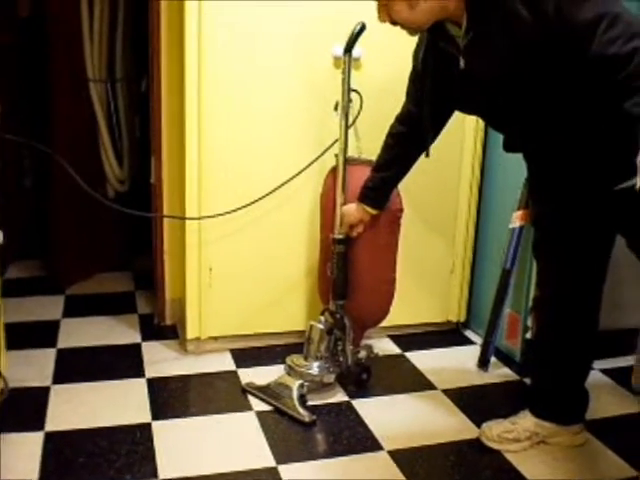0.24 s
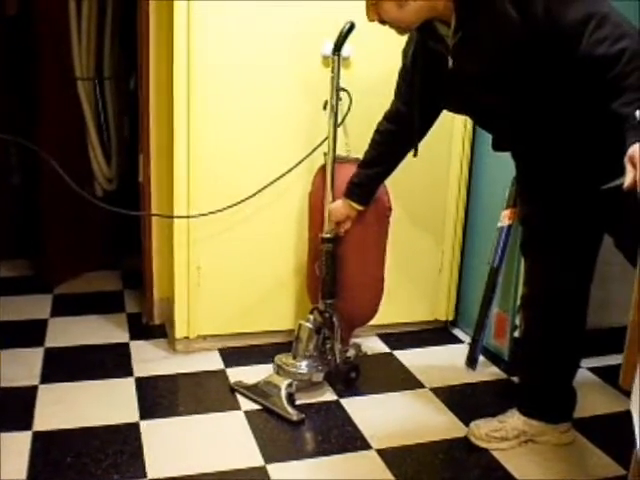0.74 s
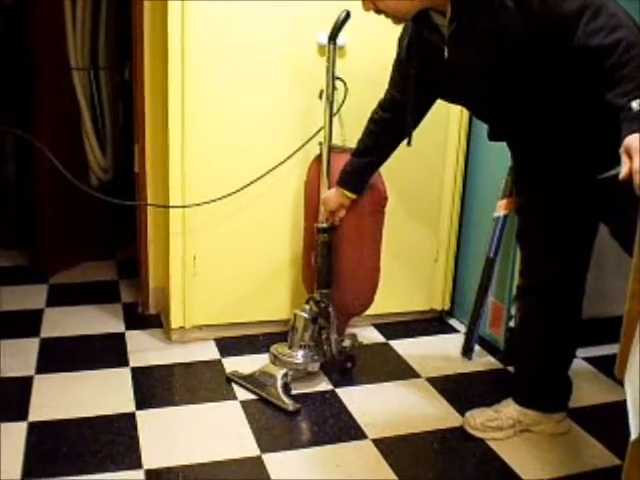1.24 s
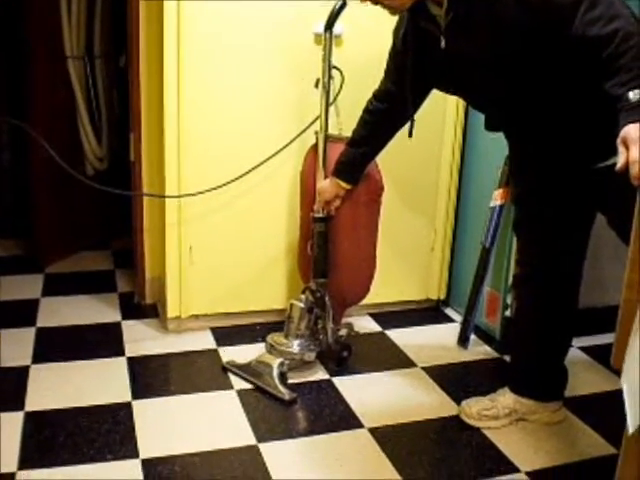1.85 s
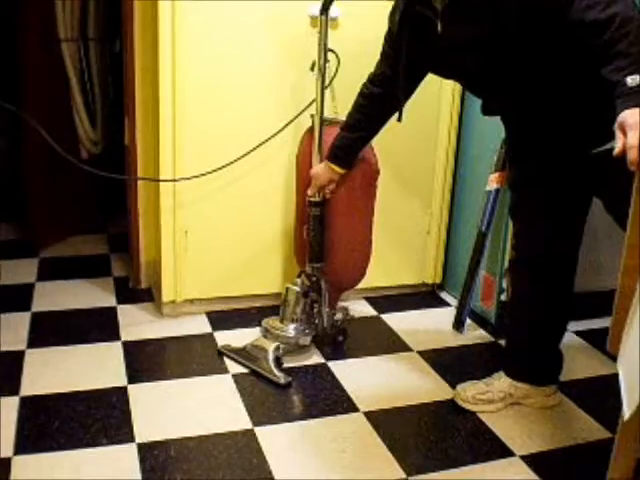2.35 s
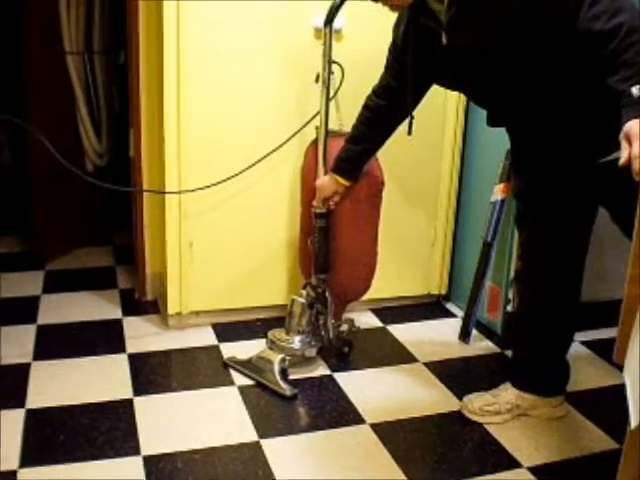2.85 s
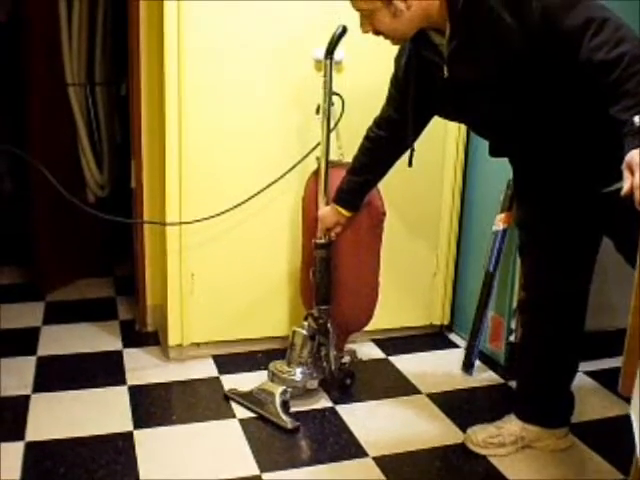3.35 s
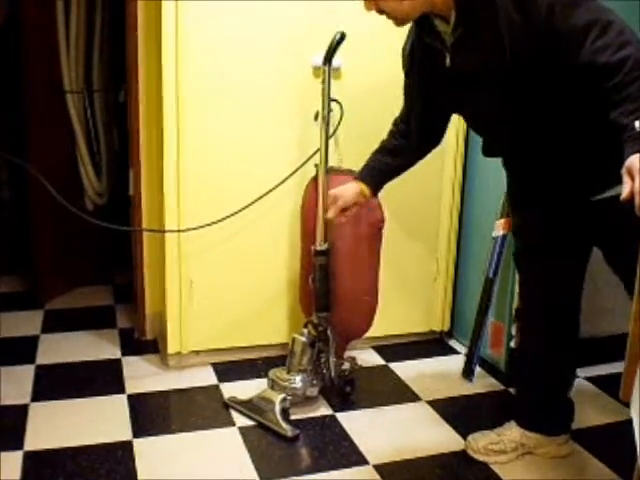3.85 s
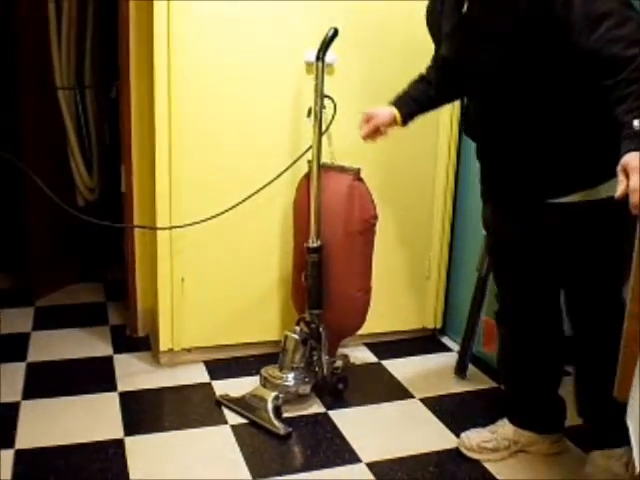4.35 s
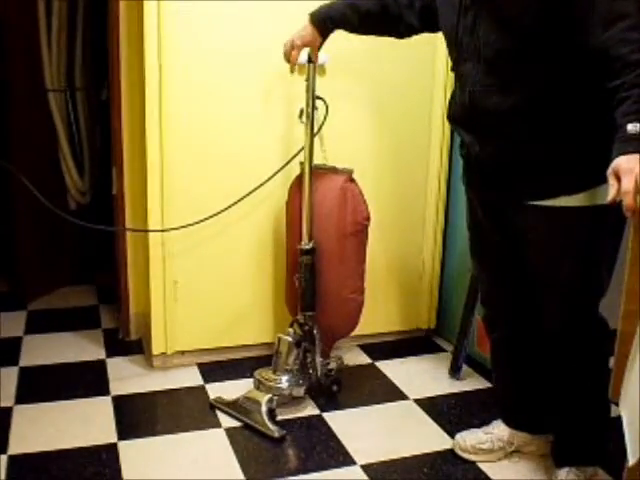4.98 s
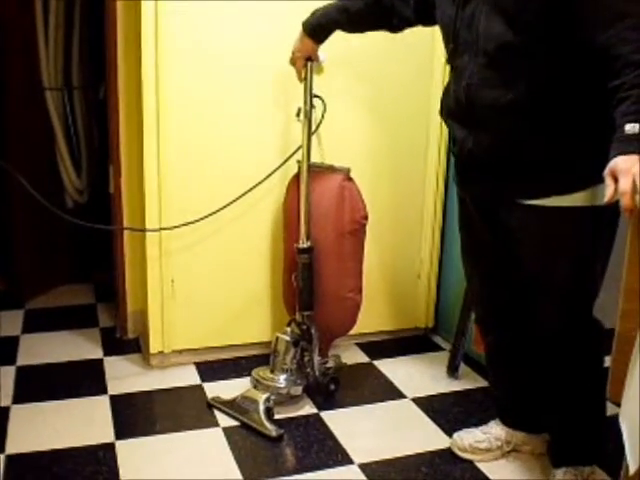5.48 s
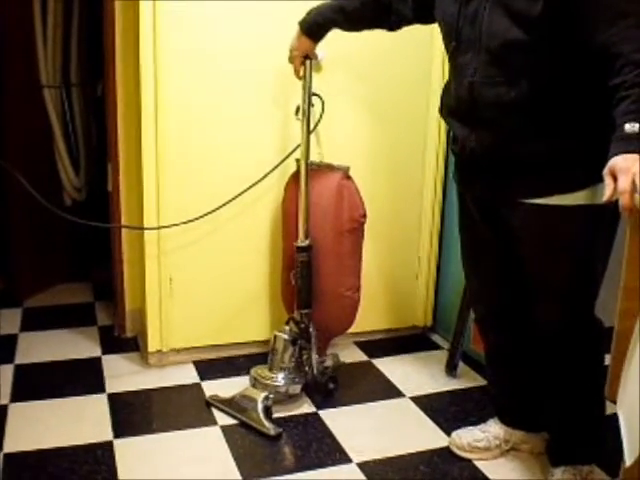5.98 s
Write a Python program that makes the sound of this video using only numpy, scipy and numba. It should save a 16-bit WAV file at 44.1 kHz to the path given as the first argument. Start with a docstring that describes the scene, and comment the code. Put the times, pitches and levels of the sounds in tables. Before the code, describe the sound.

An antique upright vacuum cleaner is already running in a small hard-floored room. Rushing air and a strong, wavering fan whistle start loud and high, slide down quickly, then level off. After about three seconds the pitch drops again and the sound thins, still running at the end. A small camera microphone gives a narrow, dull-topped sound that rasps when the whistle swells.

```python
"""An antique upright vacuum cleaner runs in a tiled room, its motor slowing from about 174 to 136 turns a second.
Shaped noise makes the rushing air; a seven-blade fan whistles at seven times the shaft speed.
Armature slots whine at eleven times the shaft speed, and the mains hum at 120 and 240 Hz in the housing.
A small camera with a narrow band picks it up; its fast limiter overloads when the whistle swells."""
import sys
import numpy as np
from scipy.fft import rfft, irfft, next_fast_len
from scipy.io import wavfile
from scipy.ndimage import map_coordinates
from numba import njit

SR = 44100
rng = np.random.default_rng(int(sys.argv[2]) if len(sys.argv) > 2 else 0)


def generate_wav(sig):
    """Save sig (samples, or channels by samples) to the path in sys.argv[1] as 16-bit PCM at SR."""
    pcm = np.round(np.clip(np.atleast_2d(sig).T, -1, 1) * 32767).astype(np.int16)
    wavfile.write(sys.argv[1], SR, pcm)


N = 274302

BLADES, SLOTS = 7, 11
CRUISE_HZ = 154  # shaft speed at which the air and whistle base levels apply
MAGNET_HZ = 120  # two field pulses per mains cycle


def amp(db):
    """Decibels to gain."""
    return 10 ** (np.asarray(db) / 20)


def unit(x):
    """Scale to rms 1."""
    return x / np.sqrt(np.mean(x ** 2) + 1e-20)


def along(points, hz):
    """Read (f/Hz, value) points on a log frequency axis."""
    f, value = np.transpose(points)
    return np.interp(np.log(hz + 1), np.log(f + 1), value)


def lift_db(resonances, hz):
    """Sum of the resonance lifts, in dB, at a frequency."""
    return sum(db / (1 + (2 * (hz - centre) / width) ** 2) for centre, width, db in resonances)


def wobble(rate_hz):
    """Smooth random curve with rate_hz knots a second."""
    knots = rng.standard_normal(int(N * rate_hz / SR) + 4)
    return map_coordinates(knots, [np.arange(N) * rate_hz / SR])


def filtered(x, response):
    """Multiply the spectrum of x by a response of frequency."""
    size = next_fast_len(N + SR // 2)
    spectrum = rfft(x, size) * response(np.fft.rfftfreq(size, 1 / SR))
    return irfft(spectrum, size)[:N]


def tone(cycles, rough, rate_hz):
    """Sine of rms 1 whose size and phase flutter randomly."""
    flutter = 1 + rough * (wobble(rate_hz) + 1j * wobble(rate_hz))
    return unit(np.real(flutter * np.exp(2j * np.pi * cycles)))


# motor shaft speed: t/s, f/Hz
SHAFT_SPEED = [(0.0, 174.5), (0.28, 174.25), (0.57, 167.55), (0.9, 162.68), (1.2, 159.88), (1.45, 158.07),
               (1.76, 156.32), (2.1, 155.32), (2.75, 154.11), (3.2, 153.78), (3.45, 149.89), (3.7, 146.85),
               (3.96, 144.78), (4.26, 142.38), (4.62, 140.21), (5.0, 138.73), (5.35, 137.74), (6.22, 136.2)]


def shaft_speed():
    """Shaft speed in Hz at each sample, as the motor slows."""
    t, hz = np.transpose(SHAFT_SPEED)
    return np.interp(np.arange(N) / SR, t, hz)


# spectral density of the rushing air: f/Hz, level/dB per Hz (relative)
AIR_SPECTRUM = [(25, -46.5), (70, -43.5), (120, -37.5), (200, -24), (340, -27.5), (450, -22), (650, -29.5),
                (800, -4), (1150, -20), (1400, -13.5), (1900, -12), (2200, -16.5), (3200, -14.5),
                (3750, -22)]
# resonances of fan case, nozzle and room: f/Hz, width/Hz, lift/dB
CAVITY_RESONANCES = [(247.4, 38, 9.5), (297, 24, 5.5), (404, 43, 5), (490, 22, 4.5), (550, 88, 9),
                     (619, 78, 12.5), (706.7, 54, 11), (880, 16, 0), (980, 26, 3), (1006, 29, 5),
                     (1072, 38, 15.5), (1181, 109, 15), (1294, 23, 7.5), (1342, 38, 6), (1499, 65, 6.5),
                     (1661, 110, 5.5), (1830, 80, 4.5), (2042, 72, 4), (2390, 27, 4), (2503, 24, 9),
                     (2774, 110, 6), (3150, 81, 5.5), (3460, 160, 5.5), (3626, 41, 9.5)]


def air_colour(hz):
    """Gain of turbulence heard through the machine's resonances."""
    return amp(along(AIR_SPECTRUM, hz) + lift_db(CAVITY_RESONANCES, hz))


def air(speed, split_hz=1250, roar_db=-26.5, hiss_db=-27.0, roar_db_per_octave=21, hiss_db_per_octave=18.5):
    """Turbulence: a roar in the fan case and a hiss at the nozzle, both easing as the motor slows."""
    def low_share(hz):
        return 1 / (1 + (hz / split_hz) ** 6)

    def roar_response(hz):
        return air_colour(hz) * np.sqrt(low_share(hz))

    def hiss_response(hz):
        return air_colour(hz) * np.sqrt(1 - low_share(hz))

    octaves = np.log2(speed / CRUISE_HZ)
    roar = unit(filtered(rng.standard_normal(N), roar_response))
    hiss = unit(filtered(rng.standard_normal(N), hiss_response))
    roar_level_db = roar_db + roar_db_per_octave * octaves + 0.28 * wobble(9.8)
    hiss_level_db = hiss_db + hiss_db_per_octave * octaves + 0.41 * wobble(14)
    return roar * amp(roar_level_db) + hiss * amp(hiss_level_db)


# peaks and notches of fan case and room that the whistle slides through: f/Hz, width/Hz, lift/dB
WHISTLE_RESONANCES = [(990, 5, 4.5), (1001.5, 4, -9), (1018, 10, 7), (1031.5, 7, -7.5), (1041.5, 10, 12),
                      (1072.5, 40, 18.4), (1087, 6, 2.8), (1101.5, 4.5, 5.2), (1128, 10, 6),
                      (1160.5, 25, 10.6), (1201, 24, 7.2), (1212.5, 5, -9)]
# motor housing, crossed by the whistle's octave and the slot whine: f/Hz, width/Hz, lift/dB
HOUSING_RESONANCES = [(1526, 42, 17), (1620, 16, 8), (1645, 38, 17), (1704, 32, 13), (1756, 26, 15),
                      (1833, 28, 11), (1917, 44, 12.5), (2040, 14, 13)]


def fan(speed, turns, whistle_db=-33.5, whistle_db_per_octave=39, waver_db=0.73, waver_hz=18,
        flutter_db=-35.5, octave_db=-53.5):
    """Blades pass the outlet: whistle and octave swell on resonances; uneven inflow adds a flutter."""
    blade_hz, blade_cycles = BLADES * speed, BLADES * turns
    effort_db = whistle_db_per_octave * np.log2(speed / CRUISE_HZ)
    level_db = whistle_db + effort_db + lift_db(WHISTLE_RESONANCES, blade_hz) + waver_db * wobble(waver_hz)
    whistle = amp(level_db) * tone(blade_cycles, rough=0.026, rate_hz=45)
    flutter = amp(flutter_db + effort_db) * wobble(45) * np.cos(2 * np.pi * blade_cycles)
    octave_level_db = octave_db + lift_db(HOUSING_RESONANCES, 2 * blade_hz)
    octave = amp(octave_level_db) * tone(2 * blade_cycles, rough=0.2, rate_hz=9.5)
    return whistle + flutter + octave


def whine(hz, cycles):
    """Slot tone swelling on each housing resonance it crosses."""
    return amp(lift_db(HOUSING_RESONANCES, hz)) * tone(cycles, rough=0.18, rate_hz=12)


# weak shaft tones: multiple of shaft speed, field sideband number,
# level/dB at full speed, level/dB at lowest speed
SHAFT_TONES = [(4, 0, -42, -60.5), (9, 0, -59, -48), (10, -1, -63, -45), (10, 0, -57, -48.5),
               (11, -1, -41.5, -43), (12, 0, -56.5, -44.5), (20, 0, -48, -56.5), (21, 0, -56, -59),
               (22, 0, -58, -46), (23, 0, -61, -53.5), (26, 0, -65, -58.5), (28, 0, -63, -56.5)]


def motor(speed, turns, slot_db=-53.5, sideband_db=-53.5):
    """Armature slots whine through the housing; the pulsing field puts sidebands on the shaft tones."""
    field_cycles = MAGNET_HZ * np.arange(N) / SR
    slot_hz, slot_cycles = SLOTS * speed, SLOTS * turns
    sound = amp(slot_db) * whine(slot_hz, slot_cycles)
    sound += amp(sideband_db) * whine(slot_hz + MAGNET_HZ, slot_cycles + field_cycles)
    slowed = (speed.max() - speed) / np.ptp(speed)  # 0 at full speed, 1 at lowest
    for order, sideband, fast_db, slow_db in SHAFT_TONES:
        cycles = order * turns + sideband * field_cycles
        level_db = fast_db + (slow_db - fast_db) * slowed
        sound += amp(level_db) * tone(cycles, rough=0.79, rate_hz=8)
    return sound


def hum(buzz_db=-52, base_db=-68):
    """The pulsing field shakes the housing, mostly at twice its own rate."""
    field_cycles = MAGNET_HZ * np.arange(N) / SR
    buzz = amp(buzz_db) * tone(2 * field_cycles, rough=1.0, rate_hz=12)
    base = amp(base_db) * tone(field_cycles, rough=0.3, rate_hz=4.4)
    return buzz + base


def scene():
    """One shaft speed drives air, fan and motor; the hum keeps the mains rate."""
    speed = shaft_speed()
    turns = np.cumsum(speed) / SR
    return (air(speed) + fan(speed, turns) + motor(speed, turns) + hum())[None]


@njit
def held_peak(size, keep):
    """Follow each peak at once, then decay by the factor keep a sample."""
    held = size.copy()
    for i in range(1, len(held)):
        held[i] = max(size[i], held[i - 1] * keep)
    return held


def record(dry, band_hz=3850, top_hz=15900, ceiling=0.27, release_s=0.0048,
           thump_db=-26, thump_hz=110, coupling_hz=35, floor_db=-97):
    """Camera: steep low-pass, then a fast limiter that pins peaks, rasps and leaks a soft thump as it ducks."""
    def band_response(hz):
        return amp(-5 * np.clip((hz - band_hz) / 145 + 1, 0, 5) ** 2)  # -5 dB at band_hz

    def thump_response(hz):
        high_pass = 1j * hz / (coupling_hz + 1j * hz)
        return high_pass / (1 + 1j * hz / thump_hz)

    narrow = filtered(dry[0], band_response)
    peak = held_peak(np.abs(narrow), np.exp(-1 / (release_s * SR)))
    gain = ceiling / np.maximum(peak, ceiling)
    thump = amp(thump_db) * filtered(gain - 1, thump_response)
    noise_floor = amp(floor_db) * rng.standard_normal(N)
    limited = narrow * gain + thump + noise_floor
    return filtered(limited, lambda hz: hz < top_hz)[None]


dry = scene()
out = record(dry)
generate_wav(out)
```